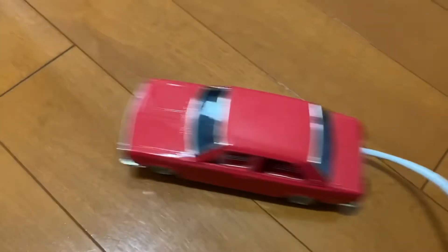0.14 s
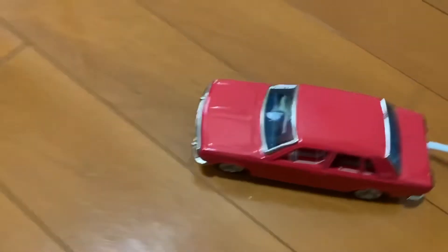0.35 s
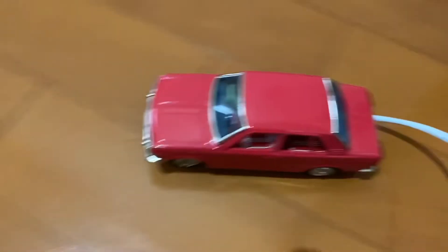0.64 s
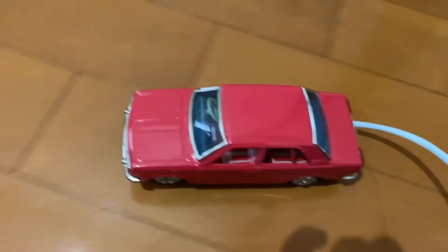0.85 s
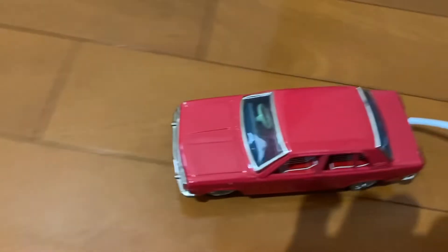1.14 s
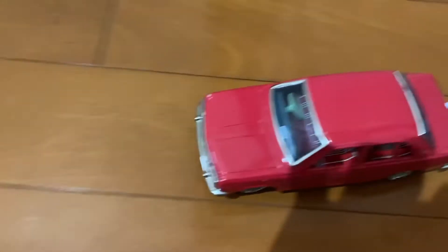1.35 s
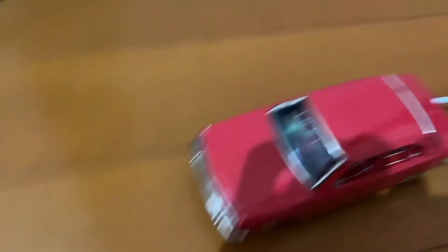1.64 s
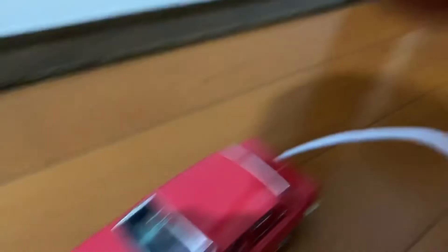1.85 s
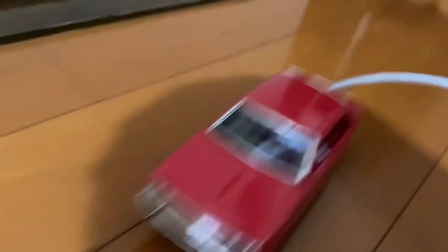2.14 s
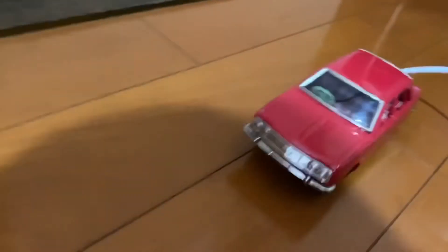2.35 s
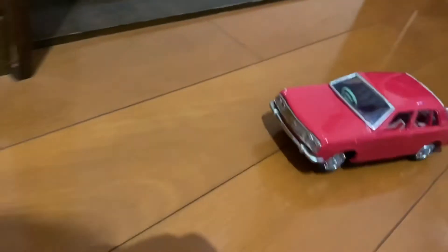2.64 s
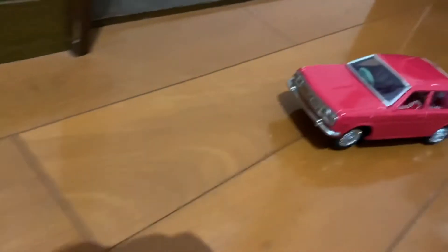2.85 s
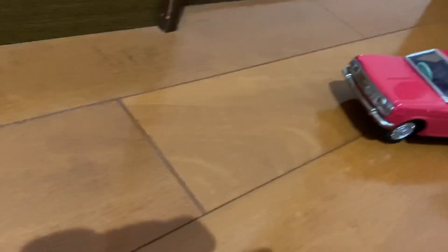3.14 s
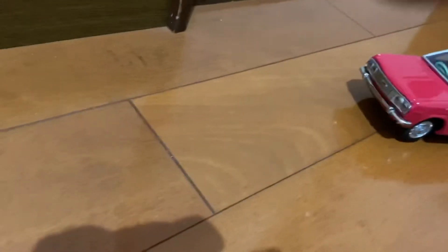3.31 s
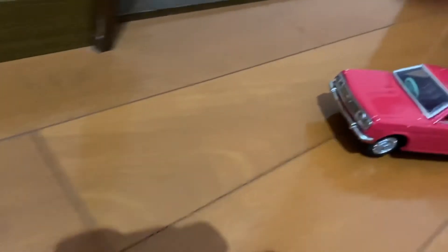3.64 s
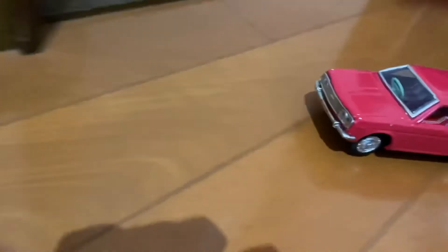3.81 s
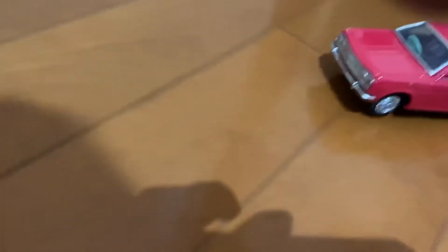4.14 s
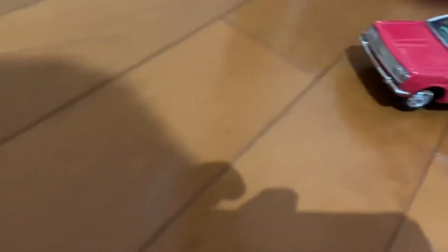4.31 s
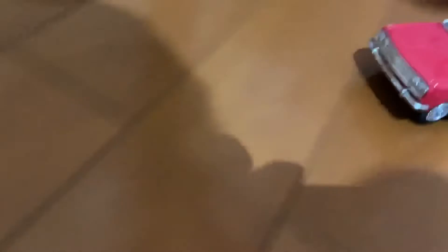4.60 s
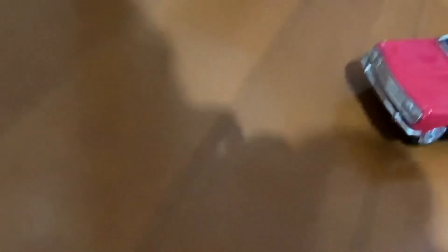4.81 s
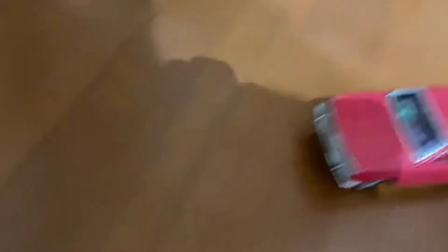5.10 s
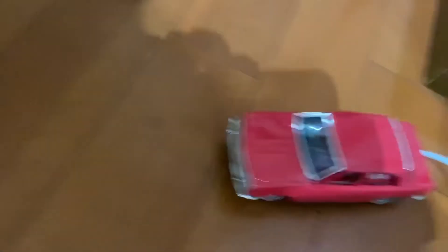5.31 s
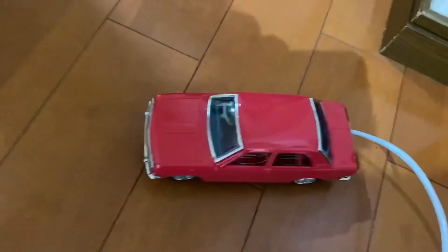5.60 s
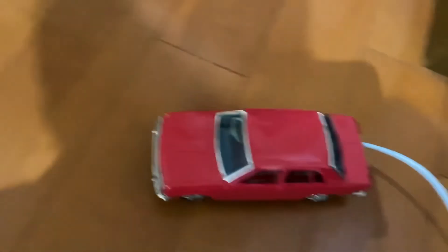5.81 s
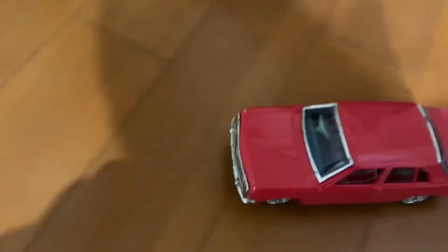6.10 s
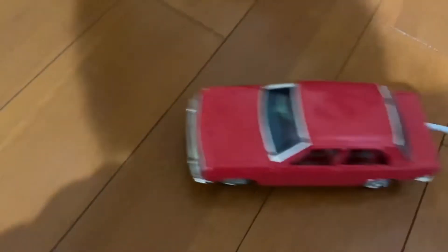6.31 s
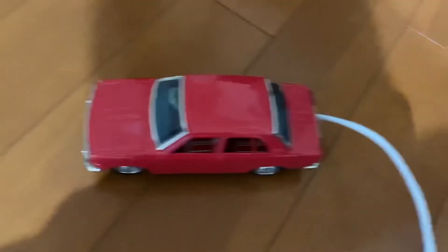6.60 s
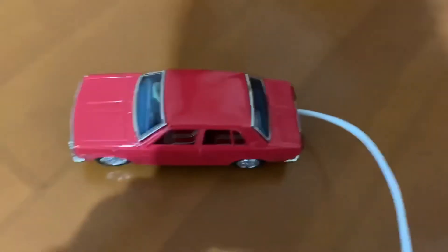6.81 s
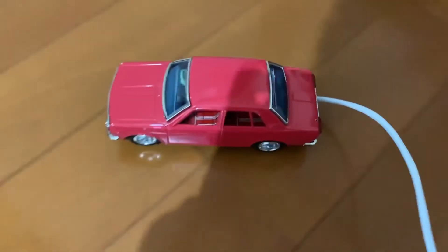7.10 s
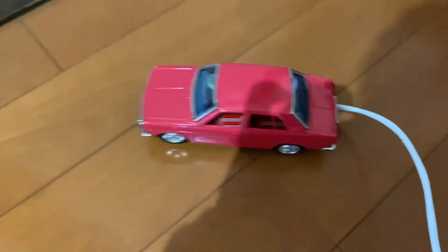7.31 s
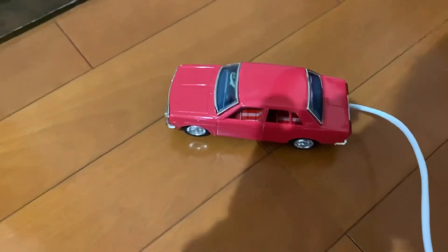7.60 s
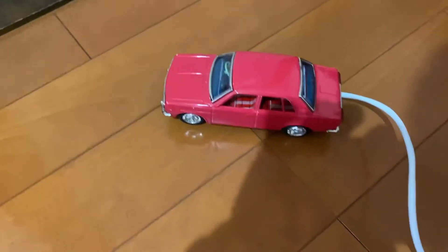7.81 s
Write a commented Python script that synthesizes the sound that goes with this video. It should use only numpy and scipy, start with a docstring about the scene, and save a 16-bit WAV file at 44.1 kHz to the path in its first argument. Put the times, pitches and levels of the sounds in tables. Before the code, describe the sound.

A tin toy car is already running over a wooden floor, close to the microphone in a quiet room. Its gears make a dense, hissy metallic clatter, with a faint motor whine and a low, uneven rumble from the boards. At 1.6 seconds the drive cuts out and loose gears tick a few times. Three short bursts follow at about 2.2, 2.8 and 3.2 seconds, raspier, with ticks and tiny bright scrapes. A longer run lasts from 3.4 to 5 seconds. A quick cluster of dry ticks over a soft rustle ends in a sharper one at 5.3 seconds, as the car restarts with a higher, clearer whine. The gears snag briefly several times until about 5.8 seconds. At 7.1 seconds the power goes off and the car coasts to rest. Two ticks come near 7.3 seconds, then two soft, dull bumps at 7.5 and 7.9.

```python
"""A tin toy car on a wire runs over a wooden floor, close to a pair of microphone ports.
From the start, gear teeth clatter into the tin shell, the motor whines faintly and the wheels make
the boards rumble, over room air and a soft rustle. At 1.6 s the drive drops out, then goes in three
short bursts; slack gears tick at stops and starts, and running gears snag. Two longer runs follow
from 3.4 s and 5.3 s. The power goes off at 7.1 s, and two last ticks and two soft bumps end it."""
import sys
import numpy as np
from scipy import signal
from scipy.fft import rfft, irfft, next_fast_len
from scipy.io import wavfile

SR = 44100
rng = np.random.default_rng(int(sys.argv[2]) if len(sys.argv) > 2 else 0)


def inscribe(sig):
    """Save sig as 16-bit PCM at rate SR to the path in sys.argv[1].

    A 1-D sig is mono; a 2-D sig holds one channel per row.
    Samples are clipped to [-1, 1] before scaling.
    """
    pcm = np.round(np.clip(np.atleast_2d(sig).T, -1, 1) * 32767)
    wavfile.write(sys.argv[1], SR, pcm.astype(np.int16))


N = 350588
TIME_S = np.arange(N) / SR
FFT_SIZE = next_fast_len(N)
BIN_HZ = np.arange(1, FFT_SIZE // 2 + 2) * SR / FFT_SIZE


def from_db(db):
    """Turns decibels into a gain to multiply by."""
    return 10 ** (np.asarray(db) / 20)


def unit_level(x):
    """Scales a sound so that its average strength (rms) is 1."""
    return x / np.sqrt(np.mean(x ** 2) + 1e-20)


def over_time(rows):
    """Joins rows of (time_s, values...) into one curve for each value column."""
    times_s, *columns = np.transpose(rows)
    return [np.interp(TIME_S, times_s, column) for column in columns]


def over_pitch(rows):
    """Joins rows of (pitch_hz, value) into a curve across the spectrum."""
    hz, values = np.transpose(rows)
    return np.interp(np.log(BIN_HZ), np.log(hz), values)


def colour(x, spectrum):
    """Shapes flat noise with rows of (pitch_hz, level_db)."""
    return irfft(rfft(x, FFT_SIZE) * from_db(over_pitch(spectrum)), FFT_SIZE)[:, :N]


def filtered(x, kind, hz, order=2):
    """Keeps the highs or one band; a higher order cuts more steeply."""
    return signal.sosfilt(signal.butter(order, hz, kind, fs=SR, output="sos"), x)


def drift(rate_hz):
    """A smooth random wobble, about 1 in size."""
    step, settle = 40, 2000  # one draw every 40 samples; the first draws let the filter settle
    r = np.exp(-2 * np.pi * step * rate_hz / SR)
    slow = signal.lfilter([1], [1, -2 * r, r * r], rng.standard_normal(N // step + settle + 2))[settle:]
    return np.interp(np.arange(N) / step, np.arange(len(slow)), unit_level(slow))


def ring(x, hz, width_hz):
    """A resonance at one pitch: the narrower it is, the longer it rings."""
    r = np.exp(-np.pi * width_hz / SR)
    feedback = [1, -2 * r * np.cos(2 * np.pi * hz / SR), r * r]
    return signal.lfilter(np.array([1, 0, -1]) * (1 - r * r) / 2, feedback, x)


def ringing_metal(x, table, blend, waver_db, tilt_db=0, strain=0):
    """Many resonances at once, each wavering on its own; blend goes from tone A (0) to tone B (1)."""
    out = 0
    for k, (hz, width_hz, a_db, b_db, *strain_db) in enumerate(table):
        level_db = a_db + blend * (b_db - a_db) + strain * sum(strain_db)
        level_db += tilt_db * np.log2(hz / 1800) + waver_db * drift(2)
        out += (-1) ** k * from_db(level_db) * ring(x, hz, width_hz)
    return out


def bursts(rows, edge_db=2.5, hold_s=0):
    """Noise bursts with a sharp edge, from rows of (start_s, level_db, fade_s to fall 60 dB)."""
    length = 4000
    out, age_s = np.zeros((2, N + length)), np.arange(length) / SR
    for start_s, level_db, fade_s in rows:
        at = round(start_s * SR)
        db = level_db - 60 * np.maximum(age_s - hold_s, 0) / fade_s + edge_db * np.exp(-age_s / .0015)
        out[:, at:at + length] += rng.standard_normal((2, length)) * from_db(db)
    return out[:, :N]


# Each time the power is on: on_s, off_s, rise_s, gear_coast_db_per_s, rumble_db, rumble_coast_db_per_s
RUNS = [(-.5, 1.585, .03, -280, -33, -77), (2.193, 2.607, 0.022, -190, -28, -140),
        (2.753, 2.922, 0.035, -200, -27.5, -150), (3.147, 3.26, 0.022, -290, -29, -120),
        (3.37, 5.034, 0.027, -190, -30, -70), (5.266, 7.104, 0.029, -170, -33, -90.5)]

def power_db(start_db, wheels=False):
    """Level of the gears or wheels: it jumps and climbs at switch-on, then falls as the car coasts."""
    energy, bend_s = 1e-12, .02
    for on_s, off_s, rise_s, gear_coast, rumble_db, rumble_coast in RUNS:
        full_db, coast, lag_s = (rumble_db, rumble_coast, .019) if wheels else (0, gear_coast, 0)
        rising_db = full_db + start_db * np.exp(-np.maximum(TIME_S - on_s, 0) / (rise_s + lag_s))
        falling_db = coast * bend_s * np.logaddexp(0, (TIME_S - off_s) / bend_s)
        tail_db = -25.5 + .57 * falling_db  # a fainter tail dies more slowly
        fading = from_db(2 * falling_db) + from_db(2 * tail_db)
        energy += (TIME_S >= on_s) * from_db(2 * rising_db) * fading
    return 10 * np.log10(energy)


# Gears at full speed: time_s, clatter_db, hiss_db, rasp_db, grumble_db (last three relative to clatter)
GEAR_MIX = [(0, -23.5, -5, -10.5, -12), (.35, -23.5, -5, -10.5, -38.5), (.75, -24.5, -3, -11, -19.5),
            (1.2, -23, -6, -11.5, -32.5), (1.58, -22.5, -4.5, -1, -15), (2.25, -26, 0, -2.5, -18),
            (2.6, -25, -1, -12, -13), (2.85, -26, -1, -2.5, -9.5), (3.25, -29, -1, 0.5, -10),
            (3.55, -28.5, 0.5, -2.5, -5.5), (3.8, -27.5, -1, -9, -16.5), (4.3, -28, -1, -9.5, -33.5),
            (4.65, -26.5, 0, -11, -23), (5.0, -25.5, -2.5, -5.5, -20), (5.35, -24, -6.5, -4, -16.5),
            (5.8, -23.5, -6, -9.5, -18), (6.3, -23, -6, -7.5, -22.5), (6.8, -24.5, -4, -14.5, -27.5),
            (7.05, -27.5, -6, -12.5, -27.5)]

def gear_levels():
    """Slow gears are quieter and duller, with more grumble; they rasp when starting."""
    clatter_db, hiss_db, rasp_db, grumble_db = over_time(GEAR_MIX)
    drive_db = power_db(start_db=-16)
    slow_db = np.clip(-drive_db, 0, 25)
    starting = np.gradient(drive_db) > 0
    rasp_db += np.where(starting, .32, -.047) * slow_db
    return clatter_db + drive_db, hiss_db - .32 * slow_db, rasp_db, grumble_db + .13 * slow_db


def tooth_hits(hits_per_s=5000):
    """Gear teeth strike at random moments; two rows, for the direct and the scattered sound."""
    signs = rng.choice([-1, 1], (2, N))
    hits = rng.random((2, N)) < hits_per_s / SR
    load = from_db(.5 * (drift(8) + drift(88)))  # worn gears bind and free as they turn
    return unit_level(signs * hits * load)


# Hiss of the teeth: pitch_hz, level_db
HISS_SPECTRUM = [(2500, -11), (3500, 0.6), (5500, 0.5), (7000, -1.5), (10000, -10), (13000, -7),
                 (15000, -17.5), (15800, -5.5)]
# Small bright rings of the gear frame: pitch_hz, width_hz, tone_a_db, tone_b_db
FRAME_RINGS = [(3857, 50, -8.5, -2.5), (3290, 41, 2.5, -4), (4050, 55, -5.5, -14.5),
               (4535, 69, -15.5, 12.5), (5350, 140, 3, -1.5), (5500, 120, -1, -5.5), (6054, 120, 4.5, -19),
               (7250, 68, -8, 3), (7700, 27, -8, -4), (7920, 90, -0.5, 10), (10000, 76, 13.5, -1.5),
               (12070, 400, 13, -2)]
# Low grumble of the chassis: pitch_hz, level_db
GRUMBLE_SPECTRUM = [(140, -20.5), (200, 1.5), (260, 1.5), (310, -2.5), (375, 3.5), (440, -0.5), (500, -3.5),
                    (600, -9.5), (900, -10.5), (1300, -23)]
# Rings of the tin shell: pitch_hz, width_hz, tone_a_db, tone_b_db, change_under_strain_db
SHELL_RINGS = [(626, 95, -14, -16, -4.5), (801, 70, -15, -16, 2), (879, 44, -14, -16.5, 1),
               (938.4, 23, -7, -11.5, 1), (1119, 72, -10, -12.5, 2), (1255, 28.5, 0.5, -1.5, -0.5),
               (1382, 110, -3.5, -5, -3), (1453, 96, -2.5, -4.5, -1), (1727, 50, -0.5, -6.5, 4),
               (1886, 54, -4, -4.5, -1.5), (2036, 69, 0.5, -4, 1.5), (2330, 63, -6, -0.5, -5),
               (2443, 70, -12.5, -3.5, -3.5), (2651, 88, -4.5, -4, 5), (2772, 130, -5.5, -9, 3),
               (3034, 120, 0.5, -5.5, -1)]
# Stop-and-go bursts load the gears more: time_s, strain_0_to_1
STRAIN = [(1.6, 0.1), (2.2, 1), (3.0, 1), (3.3, 0.69), (3.7, 0.6), (4.0, 0.05)]
RASP_HZ, RASP_WIDTH_HZ = 1562, 160  # the shell ring that the straining motor gear drives hardest
SHELL_TOP_HZ = 3110  # the shell gives off little above its highest ring

def gears(blend, top_db, throb):
    """Tooth hits set the gear frame and the tin shell ringing; the chassis grumbles below."""
    clatter_db, hiss_db, rasp_db, grumble_db = gear_levels()
    teeth = throb * tooth_hits()
    hiss = colour(teeth, HISS_SPECTRUM)
    hiss = unit_level(hiss + ringing_metal(hiss, FRAME_RINGS, blend, waver_db=1.8))
    # The top treble travels in a beam, so it changes most as the car turns.
    hiss += (from_db(top_db) - 1) * filtered(hiss, "high", 8500)
    rasp = ring(ring(teeth, RASP_HZ, RASP_WIDTH_HZ), RASP_HZ, 3 * RASP_WIDTH_HZ)
    grumble = colour(rng.standard_normal((2, N)), GRUMBLE_SPECTRUM)
    tilt_db = .12 * np.clip(clatter_db + 22.5, -25, 0)  # per octave: clatter under -22.5 dB gets duller
    strain, = over_time(STRAIN)
    shell = ringing_metal(teeth, SHELL_RINGS, blend, waver_db=1.35, tilt_db=tilt_db, strain=strain)
    shell = signal.sosfilt(signal.cheby1(6, 1, SHELL_TOP_HZ, fs=SR, output="sos"), shell)
    mix = unit_level(shell) + from_db(rasp_db) * unit_level(rasp)
    mix += from_db(hiss_db) * hiss + from_db(grumble_db) * unit_level(grumble)
    return from_db(clatter_db) * mix


# Long runs, when the motor sings: start_s, end_s, shaft_hz, starts_slow_by_fraction
WHINE_RUNS = [(0, 1.59, 189.4, .025), (3.76, 5.04, 189.2, .03), (5.34, 7.05, 174.8, 0)]
# Tones of the whine: shaft_multiple, then (start_db, middle_db, end_db) for each long run
WHINE_TONES = [(2, (-61, -63.5, -62), (-58.5, -58, -55.5), (-66, -66, -67)), (3, (-54, -42, -44.5),
               (-48.5, -41, -51.5), (-72.5, -62.5, -49.5)), (5, (-60, -56, -50.5), (-55.5, -47.5, -49),
               (-53, -47, -50)), (6, (-44, -45, -48), (-44.5, -46, -52), (-54, -50, -58.5)),
               (7, (-62.5, -59, -61), (-60.5, -62.5, -62), (-45, -46.5, -48.5)), (11, (-49.5, -51.5, -53),
               (-49, -52, -45), (-49.5, -49.5, -53)), (9, (-55.5, -48, -49), (-43.5, -45.5, -36.5),
               (-58, -63.5, -64)), (15, (-65, -68, -66.5), (-62.5, -60.5, -61), (-36.5, -32.5, -39))]
# The spinning motor loads the gears unevenly: shaft_multiple, depth_0_to_1
GEAR_THROB = [(1, 0.09), (2, 0.12), (3, 0.08)]

def motor(catch_up_s=.22):
    """The motor whines at multiples of its shaft speed and gives the gears a fast throb."""
    whine, throb = 0, 1
    for run, (start_s, end_s, shaft_hz, slow_by) in enumerate(WHINE_RUNS):
        on = np.clip(np.minimum(TIME_S - start_s + .03, end_s - TIME_S) / .04, 0, 1)
        speed = 1 - slow_by * np.exp(-np.maximum(TIME_S - start_s, 0) / catch_up_s)
        speed += .004 * drift(19.88) + .0025 * drift(2.5)
        angle = 2 * np.pi * np.cumsum(shaft_hz * speed) / SR
        throb += on * sum(depth * np.cos(multiple * angle) for multiple, depth in GEAR_THROB)
        for multiple, *levels_db in WHINE_TONES:
            db = np.interp(TIME_S, [start_s, (start_s + end_s) / 2, end_s], levels_db[run])
            whine += on * np.sqrt(2) * from_db(db + 1.9 * drift(12)) * np.sin(multiple * angle)
    return whine, throb


# Swells of the floor rumble, whose pitch glides from one to the next: time_s, boost_db, pitch_hz
RUMBLE_SWELLS = [(0.02, 3.5, 92.2), (.53, 9, 97.7), (.76, 2.5, 96.97), (0.949, 4.5, 87.92), (1.1, 5, 86.5),
                 (1.26, 4.5, 93.3), (1.46, 1, 90.5), (2.28, -1.5, 100), (2.46, -1.5, 91.9),
                 (2.94, 5.5, 86.6), (3.28, 1, 92.7), (3.43, 10, 94.3), (3.6, -1.5, 84.2), (3.82, 3.5, 95.4),
                 (4.09, 7, 101), (4.27, 3, 95.5), (4.48, 3.5, 85), (4.64, 3, 102), (4.86, 4.5, 86.8),
                 (5.05, 4.5, 102), (5.6, 0.5, 104.3), (5.9, 1.5, 107.9), (6.08, 4.5, 102),
                 (6.22, 1.5, 93.5), (6.53, 5, 93.2), (6.72, 0.5, 90), (6.9, 1.5, 103), (7.02, 6.5, 88)]

def floorboards(swell_s=.03, at_rest_db=-61):
    """Rough wheels shake the boards: a rumble that swells unevenly and wanders over about 85-108 Hz."""
    _, pitch_hz = over_time(RUMBLE_SWELLS)
    swell_db = sum(db * np.exp(-.5 * ((TIME_S - s) / swell_s) ** 2) for s, db, _ in RUMBLE_SWELLS)
    level = from_db(power_db(start_db=-19, wheels=True) + swell_db) + from_db(at_rest_db)
    phase = 2 * np.pi * np.cumsum(pitch_hz) / SR
    tone = (.87 + drift(23)) * np.cos(phase) + drift(13.1) * np.sin(phase)
    noise = filtered(rng.standard_normal((2, N)), "band", [70, 170])
    rumble = level * unit_level(unit_level(tone) + from_db(-9.5) * unit_level(noise))
    return filtered(rumble, "high", 60, order=5)  # the boards give off little deep bass


# Background noise of the room: pitch_hz, level_db
AIR_SPECTRUM = [(15, -46.5), (25, -26.5), (59, 2), (149, -31.5), (165, -14), (183, -12.5), (213, -34),
                (418, -18), (451, -23), (700, -24), (1300, -32.5), (1970, -42), (3210, -54.5),
                (12000, -63.5), (15600, -96.5), (22000, -120)]

def room_air():
    """Quiet room noise with two faint hums."""
    air = from_db(-56.5) * unit_level(colour(rng.standard_normal((2, N)), AIR_SPECTRUM))
    for hum_hz, hum_db in (121, -67), (179.3, -64.5):
        air += np.sqrt(2) * from_db(hum_db + 1.5 * drift(3)) * np.sin(2 * np.pi * hum_hz * TIME_S)
    return air


# Loudness of the rustle: time_s, level_db
RUSTLE_LEVELS = [(1.7, -51), (2.15, -54.5), (3.1, -53.5), (5.0, -44), (5.15, -42.5), (5.2, -49),
                 (5.24, -49), (5.26, -54), (7.2, -68), (7.32, -58), (7.4, -67), (7.45, -72), (7.55, -70),
                 (7.8, -81.5), (7.95, -78)]
# Tone of the rustle: pitch_hz, level_db
RUSTLE_SPECTRUM = [(150, -25), (260, -1.5), (500, -6), (900, -5), (2200, -4), (3500, -11), (7400, -18.5),
                   (11000, -20), (15800, -24)]

def rustle():
    """A faint, slightly uneven rustle runs throughout and is heard when the car stands still."""
    level_db = over_time(RUSTLE_LEVELS)[0] + 1.2 * drift(10)
    return from_db(level_db) * unit_level(colour(rng.standard_normal((2, N)), RUSTLE_SPECTRUM))


# Ticks at stops and starts: start_s, level_db, crack_over_knock_db, pitch_hz
SLACK_TICKS = [(1.783, -34, 2.5, 1826), (1.8397, -34, -14, 2036), (1.8749, -34, -9, 1910),
               (1.892, -33, -19, 2210), (1.9144, -44.5, -22, 2120), (2.1935, -29.5, -9, 1602),
               (2.7536, -29, -5, 1540), (3.0999, -34, -13, 2390), (3.1552, -30.5, 5, 1515),
               (3.341, -27, -7, 2317), (5.1401, -26, -14, 1560), (5.1731, -22, -7, 1260),
               (5.2075, -21, -20, 2030), (5.224, -25.5, -20, 2130), (5.2505, -27, -21, 2110),
               (5.2666, -23.5, -27, 1535), (5.2888, -14, -25.5, 1550), (7.2532, -24.5, -13, 1130),
               (7.2896, -30, -20, 2100)]

def slack_ticks():
    """Loose gears tick: a faint crack and a dry knock that rings at its own pitch."""
    cracks = bursts([(s, db + crack_db - 6.5, .025) for s, db, crack_db, _ in SLACK_TICKS])
    knocks = bursts([(s, db - 7, .04) for s, db, _, _ in SLACK_TICKS], edge_db=3)
    out = filtered(cracks, "high", 3500) + filtered(knocks, "band", [1100, 2700], order=3)
    strike = np.arange(1200) < 500  # only the start of a knock sets off the ring
    for start_s, _, _, pitch_hz in SLACK_TICKS:
        at = round(start_s * SR)
        span = slice(at, at + len(strike))
        out[:, span] += from_db(11) * ring(knocks[:, span] * strike, pitch_hz, width_hz=200)
    return out


# Snags in the running gears: start_s, level_db, fade_s
GEAR_SNAGS = [(2.2034, -22, 0.037), (2.2343, -28.5, 0.024), (2.834, -18, 0.036), (2.9213, -20.5, 0.027),
              (3.3129, -29.5, 0.022), (3.3802, -27.5, 0.028), (5.4474, -22.5, 0.031), (5.5214, -18, 0.028),
              (5.5394, -19, 0.03), (5.5932, -20, 0.032), (5.6815, -17.5, 0.034), (5.6994, -18.5, 0.027),
              (5.7428, -18, 0.027)]

def snags():
    """The gears catch for a moment with a short, very bright scrape."""
    return filtered(bursts(GEAR_SNAGS, edge_db=-3, hold_s=.0048), "high", 8000, order=3)


# Bumps after the car has stopped: start_s, level_db, fade_s
SOFT_BUMPS = [(7.513, -39, 0.13), (7.879, -38.5, 0.116)]

def bumps():
    """Soft, dull bursts of low noise."""
    return filtered(bursts(SOFT_BUMPS), "band", [200, 480])


# How alike the two ports sound: pitch_hz, likeness_0_to_1
PORT_LIKENESS = [(30, 0.88), (60, 0.6), (130, 0.95), (290, 0.6), (640, 0.6), (1410, 0.49), (3100, 0.83),
                 (5000, 0.3), (6500, 1), (15000, 1)]
# Each part of the shell sends sound its own way, putting the ports out of step: pitch_hz, shift_radians
PORT_SHIFT = [(150, 0.099), (300, 1), (700, 0.63), (1150, 0.43), (1460, -0.95), (1720, 1), (1980, -1.2),
              (2330, -0.86), (3000, 0.91), (4500, -0.4), (6300, -1.01)]
# How much louder the left port is: pitch_hz, left_over_right_db
PORT_BALANCE = [(60, 0.5), (110, 5), (200, 0.5), (380, 2), (700, 0.5), (1290, 4.5), (2380, 3), (4400, 2.0),
                (8120, -0.5), (15000, -0.5)]
DELAY_ABOVE_HZ, PORT_DELAY_S = 6490, .00025  # the path around the body delays one port's treble

def microphone_ports(paths):
    """The left port hears the direct sound; the right hears it shifted and mixed with scattered sound."""
    direct, scattered = rfft(paths, FFT_SIZE)
    alike = over_pitch(PORT_LIKENESS)
    shift = over_pitch(PORT_SHIFT) + 2 * np.pi * PORT_DELAY_S * np.maximum(BIN_HZ - DELAY_ABOVE_HZ, 0)
    lean_left = from_db(over_pitch(PORT_BALANCE) / 2)
    right = alike * direct * np.exp(1j * shift) + np.sqrt(1 - alike ** 2) * scattered
    return irfft(np.array([direct * lean_left, right / lean_left]), FFT_SIZE)[:, :N]


# How the car faces the microphone: time_s, tone_blend_0_to_1, left_over_right_db, top_treble_db
CAR_FACING = [(0, 0.8, 0.2, 3.5), (.8, 0.48, 1.2, 4), (1.6, 0.5, -0.1, 3), (2.2, 0.44, -0.5, 5),
              (2.9, 0.2, 0.7, 1.5), (3.4, 0.13, 0.5, 4.5), (3.8, 0.32, 0.5, 7.5), (4.2, 0, 0, 2.5),
              (5.1, 0.54, 0.8, 4.5), (5.3, .9, 0.5, 4.5), (5.8, .9, 1, 7), (6.2, 0.93, 0.9, 6),
              (7.1, .9, 1.5, 4.5), (7.5, .5, 0, -12)]

def scene():
    """Car, floor and room, all heard through the two ports."""
    blend, pan_db, top_db = over_time(CAR_FACING)
    air = room_air()
    whine, throb = motor()
    mix = gears(blend, top_db, throb) + whine + floorboards() + air + rustle()
    mix += slack_ticks() + snags() + bumps()
    return microphone_ports(mix) * from_db(np.array([pan_db, -pan_db]) / 2)


def record(dry):
    """Cuts the very highest treble steeply."""
    return signal.sosfilt(signal.cheby2(24, 70, 16200, fs=SR, output="sos"), dry)


dry = scene()
out = record(dry)
inscribe(out)
```